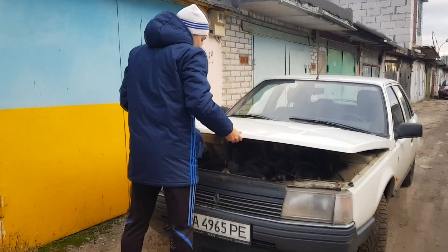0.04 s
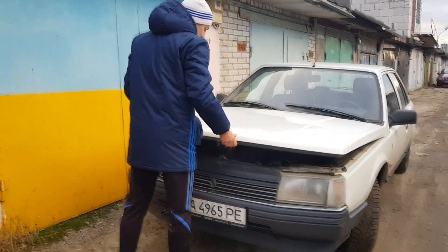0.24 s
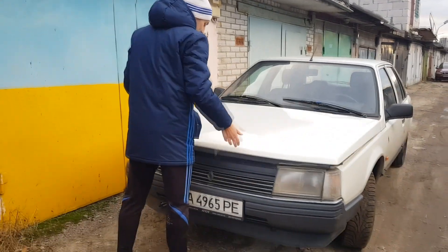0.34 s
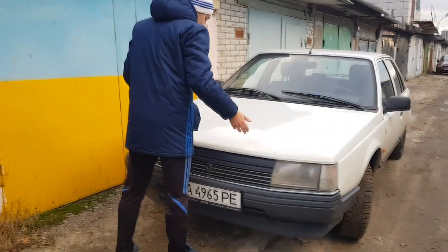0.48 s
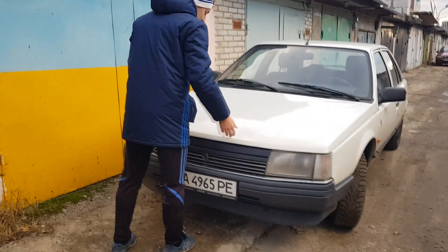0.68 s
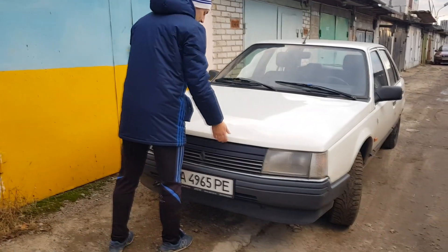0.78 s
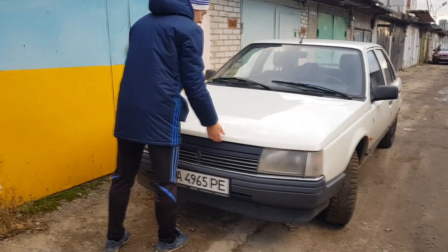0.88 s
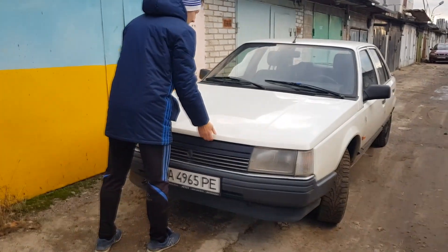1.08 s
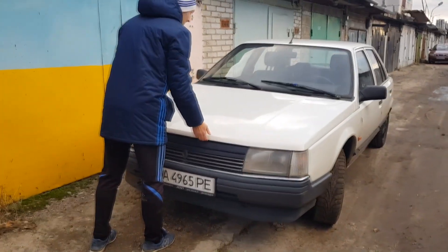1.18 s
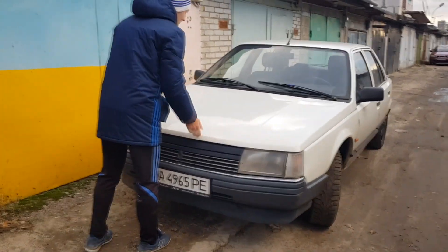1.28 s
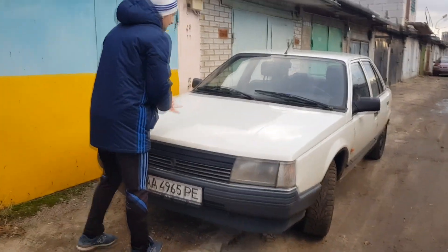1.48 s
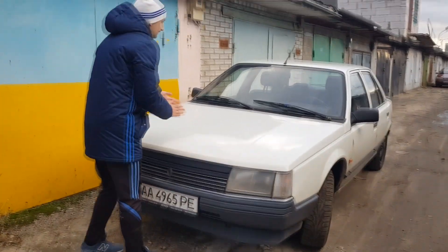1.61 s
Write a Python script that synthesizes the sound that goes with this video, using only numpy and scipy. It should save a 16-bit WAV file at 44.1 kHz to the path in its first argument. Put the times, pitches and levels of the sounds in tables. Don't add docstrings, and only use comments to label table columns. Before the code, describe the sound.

One heavy hood slam on an old car in an outdoor garage lane; wind thumps on a close stereo microphone lead in, the metal clanks and booms, the echo fades, then faint taps on metal.

```python
import sys
import numpy as np
from scipy import signal
from scipy.io import wavfile

SR = 44100
rng = np.random.default_rng(int(sys.argv[2]) if len(sys.argv) > 2 else 0)


def generate_wav(sig):
    pcm = np.round(np.clip(np.atleast_2d(sig).T, -1, 1) * 32767).astype(np.int16)
    wavfile.write(sys.argv[1], SR, pcm)


def ratio(d):
    e = np.asarray(d, float) / 20
    return 10 ** e


N = 72765

# frequency in Hz, left-right likeness 0-1.
LIKENESS = [(50, 0.87), (200, 0.9), (700, 0.26), (2000, 0.42), (8000, 0.018)]

# middle in seconds, level in dB, frequency in Hz, phase in turns 0-1.
PUFFS = [(0.010, -28, 101, 0.07), (0.025, -27.5, 184, 0.93), (0.031, -32, 470, 0.32),
         (0.032, -38.5, 650, 0.46), (0.04, -27.5, 90, 0.1), (0.082, -23.5, 261, 0.57),
         (0.206, -38, 733, 0.4), (0.089, -23, 83, 0.13), (0.102, -43, 243, 0.62), (0.129, -23, 214, 0.98),
         (0.138, -15, 76, 0.49), (0.159, -21.5, 130, 0.53), (0.175, -20.5, 87, 0.74),
         (0.187, -24, 130, 0.05), (0.194, -24, 294, 0), (0.206, -23, 482, 0.01), (0.218, -16, 87, 0.73),
         (0.229, -24.5, 238.5, 0.3), (0.241, -15.5, 117, 0.09), (0.265, -30.5, 220, 0.15),
         (0.28, -24, 106, 0.05), (0.304, -34.5, 148, 0.35), (0.322, -36, 280, 0.99), (0.385, -40.5, 81, 0),
         (0.784, -34.5, 76, 0.24), (0.93, -37, 71, 0.45)]
# middle in seconds, level in dB, frequency in Hz.
EDDIES = [(0.018, -26, 167), (0.037, -36, 114), (0.052, -34, 86), (0.074, -23.5, 236), (0.12, -34, 134),
          (0.129, -32, 123), (0.148, -25.5, 193), (0.159, -26, 333), (0.161, -27, 160), (0.19, -24.5, 150),
          (0.205, -22, 166), (0.206, -28, 403), (0.218, -23, 112), (0.239, -24, 129), (0.261, -38, 173),
          (0.279, -32, 113), (0.304, -45, 258), (0.304, -35.5, 80)]
# time in seconds, level in dB.
GUST_LEVEL = [(0, -45.5), (.13, -38.5), (.25, -36.5), (.33, -48.5), (.4, -54.5), (.5, -84.5)]
# time in seconds, left minus right in dB.
GUST_PAN = [(0, -4.5), (.045, -11), (.09, 2), (.17, -2), (.245, 2), (.28, -5), (.4, -5), (.9, 0)]
# frequency in Hz, density in dB per Hz.
GUST_SPECTRUM = [(30, -7), (150, -3.5), (400, -6), (700, -32.5)]
# frequency in Hz, left-right likeness 0-1.
GUST_LIKENESS = [(30, .3), (300, .1)]
PUFF_CYCLES, PUFF_MIN_S = 0.3, 0.0011
EDDY_BOOST_DB, GUST_LUMPS_DB = 3.0, 2.2

# frequency in Hz, density in dB per Hz.
TOWN = [(34, -17), (46, 2), (70, -11.5), (113, -21.5), (200, -25.5), (290, -17), (480, -27), (700, -37),
        (1500, -47.5)]
# frequency in Hz, density in dB per Hz.
HISS = [(590, -33.5), (1000, -6.5), (1320, -3), (2080, -3.5), (12300, -5), (16000, -4.5)]
# time in seconds, level in dB.
HISS_LEVEL = [(0, -65), (.2, -68.5), (.4, -69), (.9, -71.5), (1.0, -78), (1.19, -82.5), (1.3, -71),
              (1.5, -72.5), (1.55, -67.5), (1.65, -67.5)]
TOWN_DB, HISS_BOOST_DB = -55.5, 4.0

# middle in seconds, half length in seconds, level in dB, frequency in Hz.
SCRAPES = [
    (0.077, 0.0076, -62, 2200),
    (0.117, 0.013, -53, 2030),
    (0.131, 0.035, -61, 2300),
]

# time in seconds, then rattle, panel and latch levels in dB.
CONTACTS = [(0.401, -71.5, -61, -59), (0.413, -40.5, -43.5, -44), (0.416, -34.5, -40.5, -29),
            (0.419, -28.5, -35.5, -21.5), (0.423, -31, -35, -24), (0.438, -24.5, -37.5, -34.5),
            (0.447, -25, -20.5, -36), (0.456, -25, -10.5, -27.5), (0.464, -23, -23, -27),
            (0.475, -34, -17.5, -29.5), (0.492, -35.5, -23.5, -34)]
# time in seconds, then rattle, panel and latch levels in dB.
ECHOES = [
    (0.518, -34.5, -36, -38),
    (0.545, -50.5, -23.5, -61),
    (0.576, -47.5, -30.5, -45),
    (0.615, -62, -36.5, -53),
    (0.811, -60, -66, -59.5),
    (0.85, -63.5, -43, -63),
]
# time in seconds, level in dB.
PUSHES = [
    (0.444, -32.5),
    (0.457, -11.5),
    (0.4687, -18.5),
    (0.481, -30.5),
]
# frequency in Hz, level in dB, T60 in seconds.
BOOM_MODES = [(71, 0, .4), (67.6, -1, .44)]
# frequency in Hz, level in dB, T60 in seconds.
SEAT_MODES = [(200, -1.5, 0.063), (289.4, -13.5, 0.13), (173.4, -15, 0.18)]
# frequency in Hz, level in dB, T60 in seconds.
PANEL_MODES = [(130, -11, 0.12), (176.8, -3.5, 0.24), (220.7, -3.5, 0.21), (243, -13, 0.44),
               (318.7, -9, 0.14), (353.7, -4.5, 0.12), (409, -6.5, 0.24), (470, -15, 0.1483),
               (537.7, -11, .16)]
# frequency in Hz, level in dB, T60 in seconds.
LATCH_MODES = [(492.4, -7.5, 0.064), (645.8, 2.5, 0.14), (1028, -1, .05), (1264, -12, 0.15),
               (1545, -6, 0.04), (1792, 2, 0.067)]
# frequency in Hz, density in dB per Hz.
RATTLE = [(59, -33), (100, -16), (129, -7), (891, -15.5), (1330, -18.5), (2990, -26.5), (5530, -25.5),
          (16000, -29.5)]
# frequency in Hz, T60 in seconds.
RATTLE_T60 = [(100, 0.14), (300, 0.35), (1000, .2), (4000, 0.15), (15000, 0.056)]
# loudest moment in seconds, level in dB, frequency in Hz.
CLATTER = [(0.423, -34, 5354), (0.428, -30.5, 4223), (0.428, -34.5, 6530), (0.438, -21, 7360),
           (0.439, -34.5, 4170), (0.441, -24.5, 5694), (0.447, -30.5, 3383), (0.449, -27, 5560),
           (0.454, -33, 3373), (0.456, -23.5, 2520), (0.456, -24.5, 6614), (0.457, -28.5, 4017),
           (0.463, -28.5, 5102), (0.468, -35.5, 8240), (0.47, -30, 3404), (0.472, -32, 5800),
           (0.472, -33.5, 7515), (0.476, -29.5, 2670), (0.479, -24, 4060), (0.482, -35, 5580),
           (0.497, -40.5, 4700), (0.52, -37.5, 2720), (0.529, -43, 3180), (0.565, -41, 2524)]
# loudest moment in seconds, level in dB, frequency in Hz.
CLANGS = [(0.423, -15.5, 687), (0.424, -26, 1845), (0.427, -16, 960), (0.440, -22, 712),
          (0.458, -18.5, 906), (0.462, -20.5, 532), (0.445, -20.5, 318.8), (0.473, -21.5, 765),
          (0.474, -26, 1874), (0.479, -24, 1526), (0.493, -31.5, 1750), (0.497, -23, 960),
          (0.512, -27, 444), (0.527, -33.5, 488)]
SEAT_S, CLATTER_RISE_S, CLANG_RISE_S = 0.4874, 0.0027, 0.004037
GRAINS_PER_S, GRAIN_SPREAD_DB, GRAIN_SHARE = 5000, 2.0, 0.18
ECHO_DULL_HZ = 9000

# frequency in Hz, density in dB per Hz.
LANE = [(90, -3.5), (200, -1), (500, -12.5), (1200, -31.5), (2500, -26), (6000, -38), (15000, -52.5)]
# frequency in Hz, T60 in seconds.
LANE_T60 = [(60, 0.88), (300, 1), (1000, 0.98), (4000, .5), (15000, .4)]
# loudest moment in seconds, level in dB, frequency in Hz.
SWELLS = [
    (0.549, -24, 166.7),
    (0.574, -25.5, 287.4),
    (0.605, -31, 239.6),
    (0.664, -36, 164),
    (0.701, -40.5, 369.5),
    (0.721, -39.5, 214.8),
    (0.756, -40, 170.5),
    (0.862, -64, 192),
]
LANE_DB, LANE_START_S, LANE_RISE_S, SWELL_RISE_S = -26, 0.43, 0.0075, 0.01395

# time in seconds, then high ring, low ring and snap levels in dB.
TICKS = [
    (0.789, -66, -59, -58.5),
    (1.201, -87, -76, -64),
    (1.542, -66.5, -51, -55),
    (1.544, -66, -56, -60),
    (1.546, -54.5, -51, -53),
    (1.559, -67, -59, -64.5),
    (1.562, -60, -54.5, -64.5),
    (1.571, -68.5, -76, -64),
]
# frequency in Hz, level in dB, T60 in seconds.
TICK_HIGH_MODES = [(3360, 1.5, 0.0085), (4850, 9, 0.007), (5600, 7, 0.0089), (8370, -11, 0.0035)]
# frequency in Hz, level in dB, T60 in seconds.
TICK_LOW_MODES = [(620, -3, .015), (1050, 1, .02), (1500, -1, .02), (1800, -4, .02)]
# loudest moment in seconds, level in dB, frequency in Hz.
TAPS = [
    (1.202, -61.5, 1490),
    (1.217, -72.5, 2113),
    (1.547, -41, 605),
    (1.547, -43.5, 987),
    (1.552, -46, 630),
    (1.560, -54, 1760),
    (1.562, -53, 4769),
    (1.581, -55, 1087),
]
SNAP_T60_S, TAP_RISE_S = 0.028, 0.0016

LOW_CUT_HZ, TOP_CUT_HZ, PEAK_LIMIT = 36, 16450, 1.05


def rms_one(x):
    return x / np.sqrt(np.mean(x ** 2) + 1e-20)


def in_time(rows):
    return np.interp(np.arange(N) / SR, *np.transpose(rows))


def at_hz(points, hz):
    table_hz, values = np.array(points)[:, 0], np.array(points)[:, 1]
    return np.interp(np.log(hz), np.log(table_hz), values)


def drift(rate_hz):
    r = np.exp(-80 * np.pi * rate_hz / SR)
    white = rng.standard_normal(N // 40 + 2002)
    slow = signal.lfilter([1], [1, -2 * r, r * r], white)[2000:]
    return np.interp(np.arange(N) / 40, np.arange(len(slow)), rms_one(slow))


def clicks(s, gain):
    out = np.zeros(N)
    np.add.at(out, (np.asarray(s) * SR).astype(int), gain)
    return out + 1e-18


def ring(x, hz, t60_s):
    r, w = ratio(-60 / (t60_s * SR)), 2 * np.pi * hz / SR
    return signal.lfilter([0, np.sin(w)], [1, -2 * r * np.cos(w), r * r], x)


def dying(x, t60_s, rise_s):
    r, a = ratio(-120 / (t60_s * SR)), np.exp(-1 / (rise_s * SR))
    energy = signal.lfilter([1], [1, -r], x ** 2)
    return np.sqrt(np.abs(signal.lfilter([1 - a], [1, -a], energy)))


def bands(spectrum, envelope, patchy_db, white=None, likeness=LIKENESS):
    out, edges = 0, 25 * 2 ** np.arange(0, 9.6, 0.5)
    white = rng.standard_normal((2, 2, N)) if white is None else white
    centres = np.sqrt(edges[1:] * edges[:-1])
    inside = (centres > spectrum[0][0] / 1.2) & (centres < spectrum[-1][0] * 1.2)
    power = ratio(2 * at_hz(spectrum, centres)) * np.diff(edges) * inside
    total = np.sqrt(np.sum(power) * 4 / SR)
    for k in np.flatnonzero(inside):
        band = signal.butter(2, edges[k:k + 2], "band", fs=SR, output="sos")
        mid, side = signal.sosfilt(band, white[k % 2])
        alike = np.clip(at_hz(likeness, centres[k]), 0, 1)
        gain = ratio(at_hz(spectrum, centres[k]) + patchy_db * drift(20)) * envelope(centres[k])
        out = out + gain * (np.sqrt(1 + alike) * mid + np.sqrt(1 - alike) * side * [[1], [-1]])
    return out / total


def struck(s, db, modes, spread_db):
    out = np.zeros((2, N))
    luck = rng.standard_normal((len(s), len(modes), 3))
    for k, (hz, mode_db, t60_s) in enumerate(modes):
        gain = ratio(db + mode_db + spread_db * luck[:, k, 0]) * np.sign(luck[:, k, 1])
        wide = np.sqrt(1 - np.clip(at_hz(LIKENESS, hz), 0, 1)) * luck[:, k, 2] * 0.25
        out += ring(clicks(s, gain), hz, t60_s)
        out += ring(clicks(s, gain * wide), hz + hz / 30, t60_s) * [[1], [-1]]
    return out


def pings(rows, rise_s):
    out, luck = np.zeros((2, N)), rng.standard_normal((len(rows), 2))
    age = np.arange(int(12 * rise_s * SR)) / SR / rise_s
    shape = np.where(age < 1, np.sin(np.pi / 2 * age) ** 2, np.exp((1 - age) / 2.04))
    for (s, db, hz), (turn, lean) in zip(rows, luck):
        unlike = 1 - np.clip(at_hz(LIKENESS, hz), 0, 1)
        apart = np.array([[1], [-1]]) * np.clip(lean, -1, 1) * unlike
        tone = ratio(db) * shape * np.sin(2 * np.pi * (hz * rise_s * age + turn) + apart)
        start = int((s - rise_s) * SR)
        out[:, start:start + len(age)] += tone[:, :N - start]
    return out


def puff(middle_s, db, hz, turn):
    t = np.arange(N) / SR - middle_s
    width_s = PUFF_MIN_S + PUFF_CYCLES / hz
    return ratio(db) * np.exp(-0.5 * (t / width_s) ** 2) * np.cos(2 * np.pi * (hz * t + turn))


def wind():
    puffs = sum(puff(*row) for row in PUFFS)
    eddies = sum(puff(s, db + EDDY_BOOST_DB, hz, rng.random()) for s, db, hz in EDDIES)
    level = ratio(in_time(GUST_LEVEL) + GUST_LUMPS_DB * drift(21))
    gust = level * bands(GUST_SPECTRUM, lambda hz: 1, 1.8, likeness=GUST_LIKENESS)
    gust = signal.sosfilt(signal.butter(6, 850, fs=SR, output="sos"), gust)
    pan = ratio(np.array([[0.5], [-0.5]]) * in_time(GUST_PAN))
    return (puffs + gust) * pan + eddies * [[1], [-1]]


def town_and_hiss():
    town = ratio(TOWN_DB) * bands(TOWN, lambda hz: 1, 1.6)
    hiss = ratio(in_time(HISS_LEVEL) + HISS_BOOST_DB) * bands(HISS, lambda hz: 1, 0.39)
    return town + hiss


def hinge():
    t, out = np.arange(N) / SR, 0
    for s, half_s, db, hz in SCRAPES:
        rub = ring(ring(rng.standard_normal((2, N)), hz, 0.002), hz, 0.002)
        out = out + ratio(db) * np.exp(-0.5 * ((t - s) / half_s) ** 2) * rms_one(rub)
    return out


def boom():
    push_s, push_db = np.transpose(PUSHES)
    bay = sum(ratio(db) * ring(clicks(push_s, ratio(push_db)), hz, t60_s) for hz, db, t60_s in BOOM_MODES)
    seat = sum(ring(clicks([SEAT_S], ratio(db)), hz, t60_s) for hz, db, t60_s in SEAT_MODES)
    both = bay + seat
    return both + 0.065 * np.roll(both, 150) * [[1], [-1]]


def rattle(s, rattle_db):
    grains = (rng.random(N) < GRAINS_PER_S / SR) * ratio(GRAIN_SPREAD_DB * np.minimum(rng.exponential(1, N), 4))
    grainy = np.sqrt(1 - GRAIN_SHARE + GRAIN_SHARE * rms_one(grains) ** 2)
    white = rng.standard_normal((2, 2, N)) * grainy
    direct = np.arange(len(s)) < len(CONTACTS)
    hits = clicks(s, ratio(rattle_db + 8.5) * direct)
    echoes = clicks(s, ratio(rattle_db + 6.5) * ~direct)

    def envelope(hz):
        t60_s = at_hz(RATTLE_T60, hz)
        near = dying(hits, t60_s, 0.0012 + 2.1 / hz)
        far = dying(echoes, 1.28 * t60_s, 0.0035) / np.hypot(1, hz / ECHO_DULL_HZ)
        return np.hypot(near, far)

    return bands(RATTLE, envelope, 1.7, white)


def hood():
    s, rattle_db, panel_db, latch_db = np.transpose(CONTACTS + ECHOES)
    panel = signal.lfilter([0.15], [1, -0.85], struck(s, panel_db, PANEL_MODES, 1.86))
    latch = struck(s, latch_db, LATCH_MODES, 0.7)
    loose = rattle(s, rattle_db) + pings(CLATTER, CLATTER_RISE_S)
    return boom() + panel + latch + loose + pings(CLANGS, CLANG_RISE_S)


def lane():
    start = clicks([LANE_START_S], ratio(LANE_DB))
    tail = bands(LANE, lambda hz: dying(start, at_hz(LANE_T60, hz), LANE_RISE_S), 1.0)
    return tail + pings(SWELLS, SWELL_RISE_S)


def ticks():
    s, high_db, low_db, snap_db = np.transpose(TICKS)
    noise = signal.lfilter([1], [1, -0.5], rng.standard_normal((2, N)))
    snap = dying(clicks(s, ratio(snap_db)), SNAP_T60_S, 0.00033) * noise
    rings = struck(s, high_db, TICK_HIGH_MODES, 1.26) + struck(s, low_db, TICK_LOW_MODES, 1.0)
    return rings + snap + pings(TAPS, TAP_RISE_S)


def scene():
    return wind() + town_and_hiss() + hinge() + hood() + lane() + ticks()


def band_limit(x):
    return signal.sosfilt(signal.butter(12, 16660, fs=SR, output="sos"), x)


def record(dry):
    bass_cut = signal.sosfilt(signal.butter(2, LOW_CUT_HZ, "high", fs=SR, output="sos"), dry)
    rounded = PEAK_LIMIT * np.tanh(bass_cut / PEAK_LIMIT)
    mix = signal.sosfilt(signal.cheby2(20, 60, TOP_CUT_HZ, fs=SR, output="sos"), rounded)
    return band_limit(mix)


dry = scene()
out = record(dry)
generate_wav(out)
```